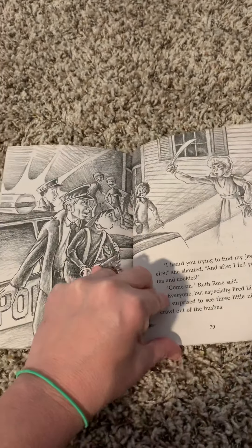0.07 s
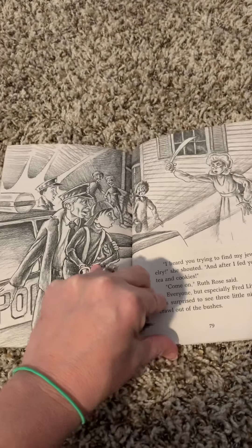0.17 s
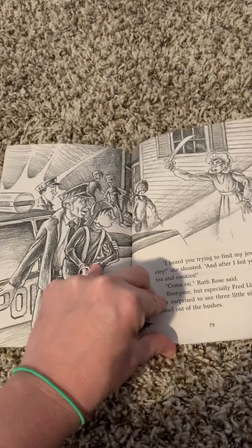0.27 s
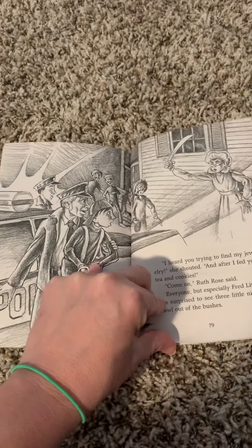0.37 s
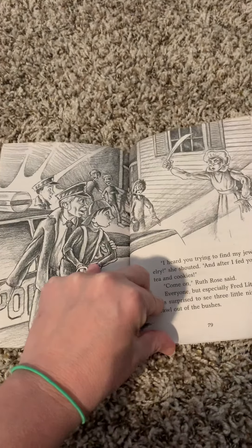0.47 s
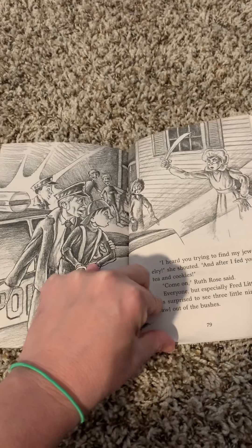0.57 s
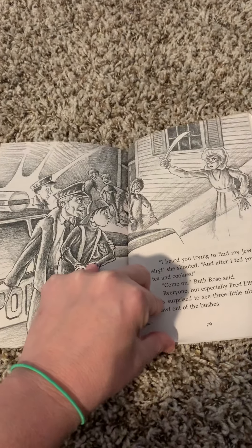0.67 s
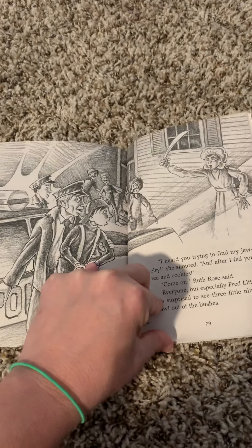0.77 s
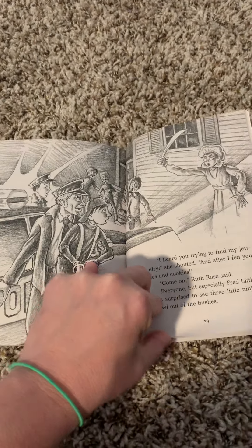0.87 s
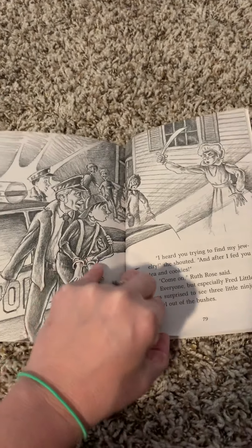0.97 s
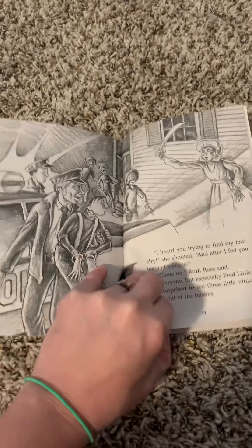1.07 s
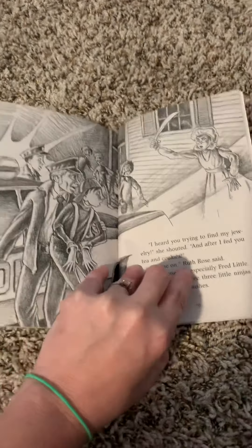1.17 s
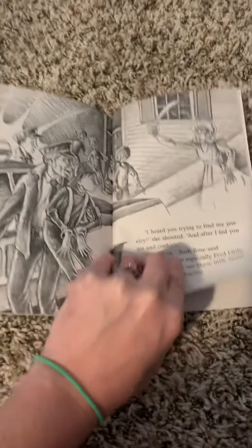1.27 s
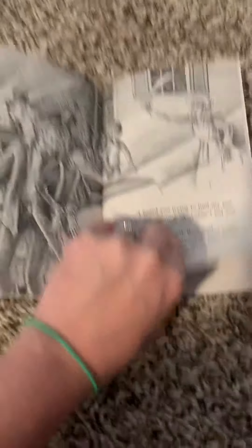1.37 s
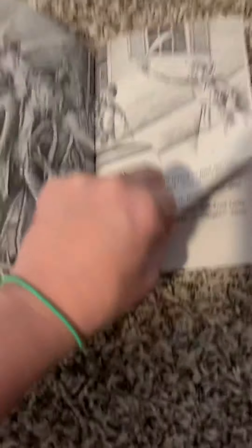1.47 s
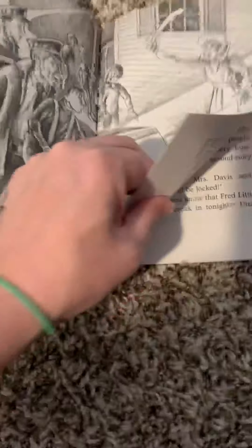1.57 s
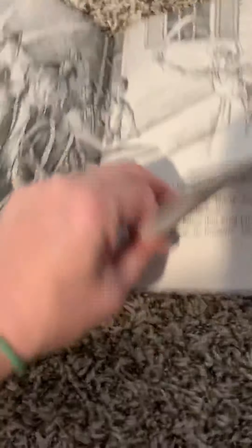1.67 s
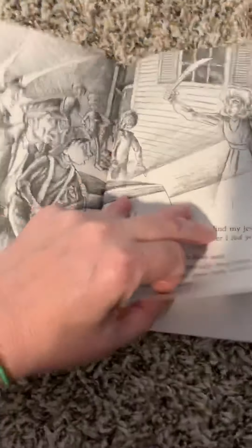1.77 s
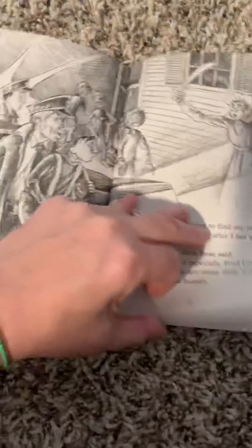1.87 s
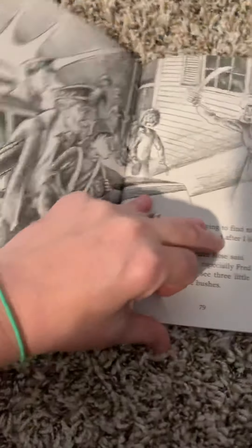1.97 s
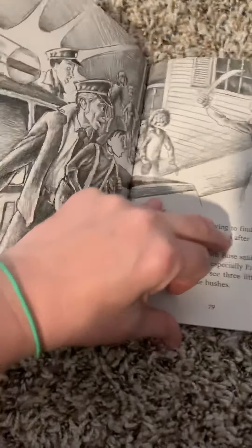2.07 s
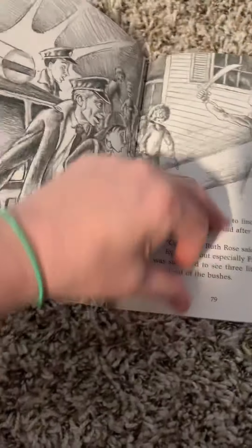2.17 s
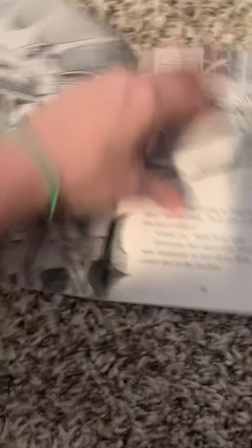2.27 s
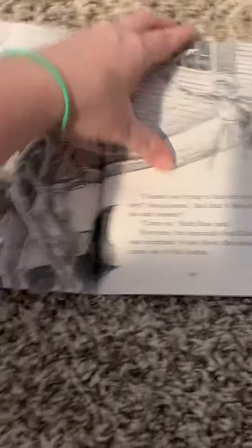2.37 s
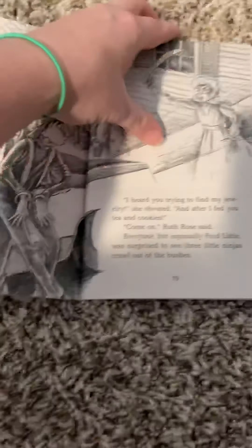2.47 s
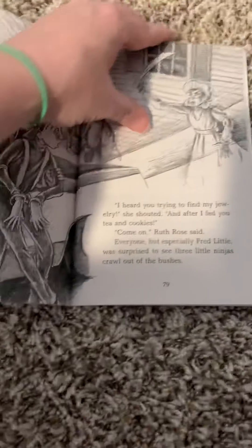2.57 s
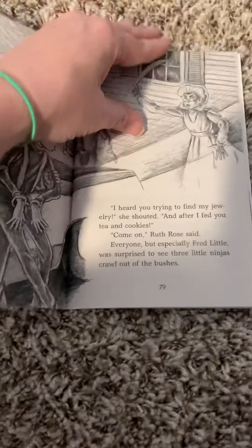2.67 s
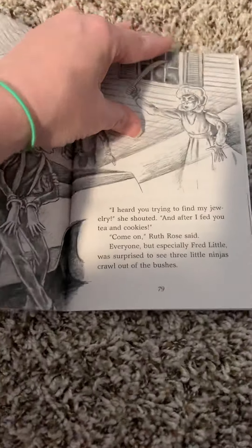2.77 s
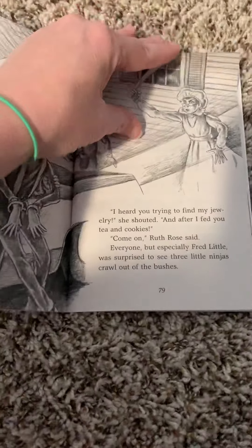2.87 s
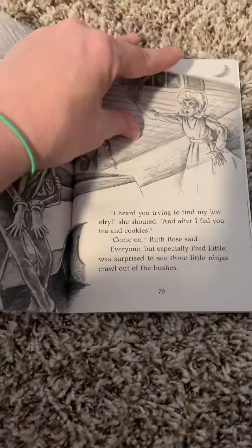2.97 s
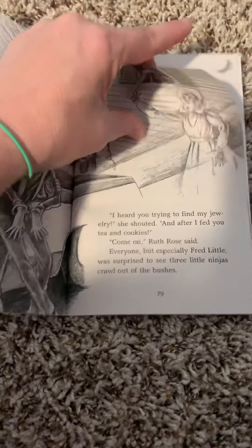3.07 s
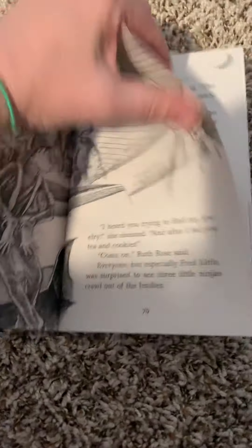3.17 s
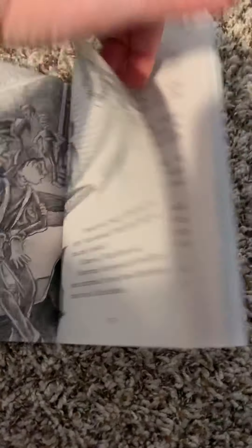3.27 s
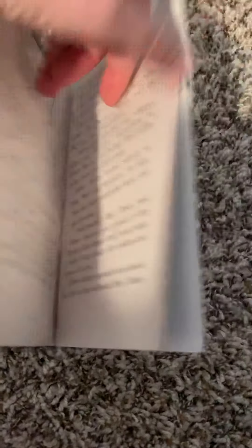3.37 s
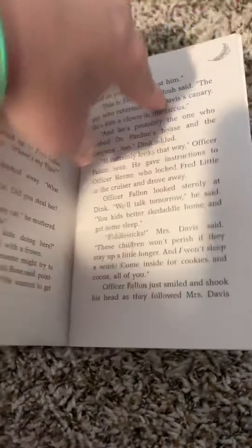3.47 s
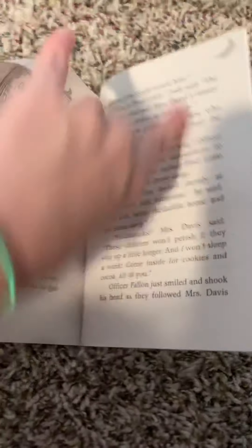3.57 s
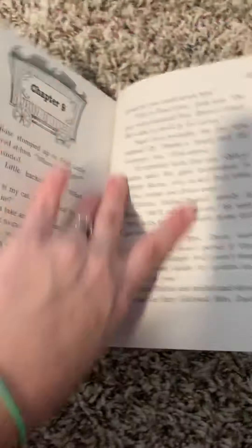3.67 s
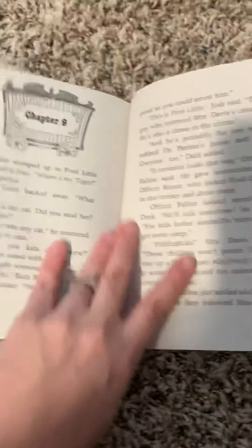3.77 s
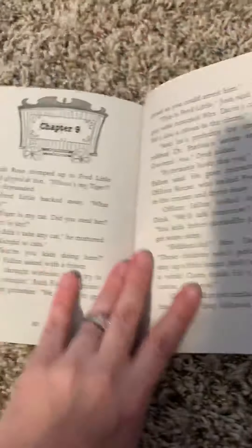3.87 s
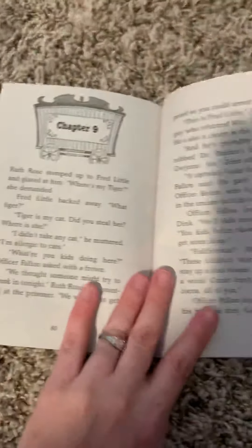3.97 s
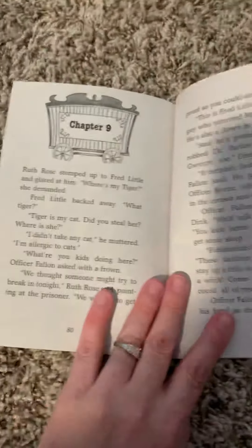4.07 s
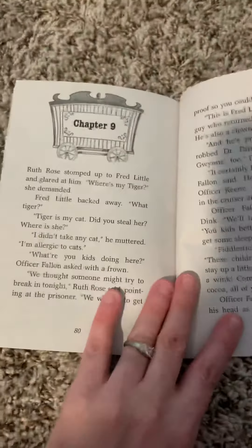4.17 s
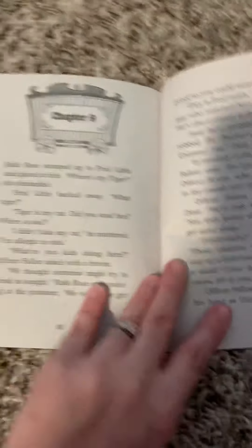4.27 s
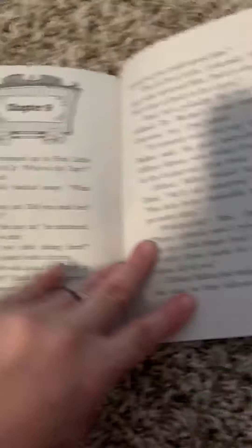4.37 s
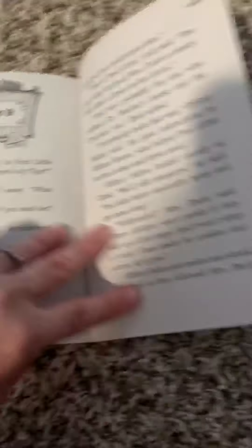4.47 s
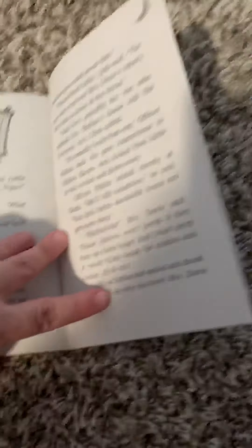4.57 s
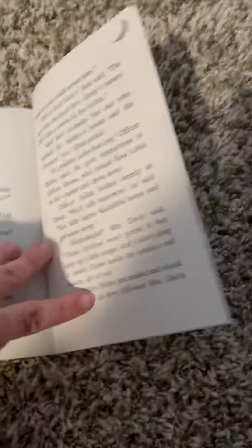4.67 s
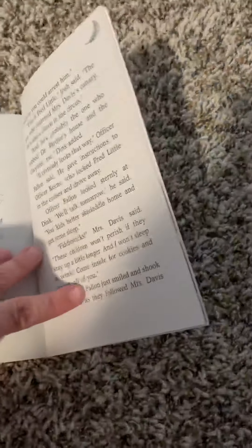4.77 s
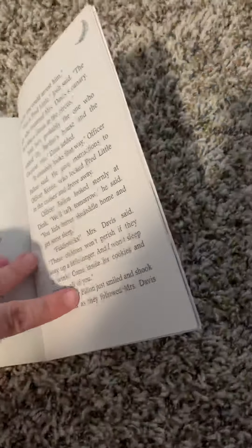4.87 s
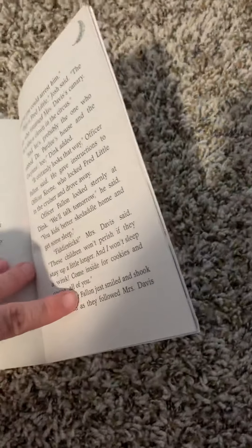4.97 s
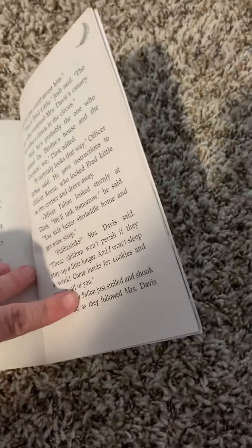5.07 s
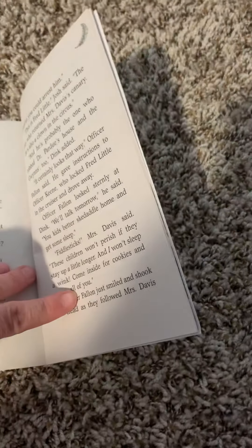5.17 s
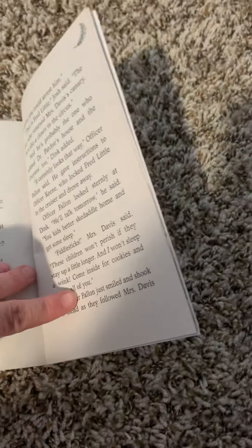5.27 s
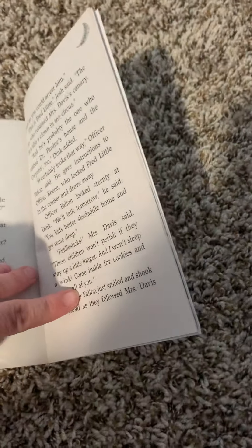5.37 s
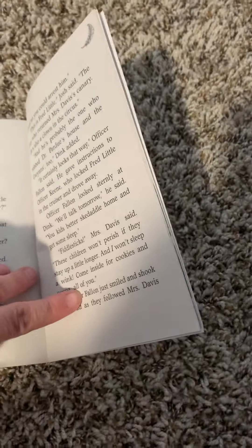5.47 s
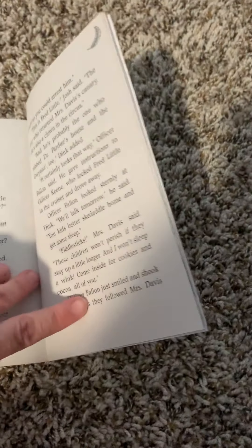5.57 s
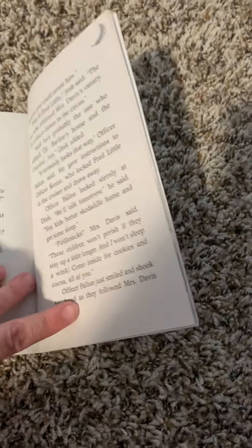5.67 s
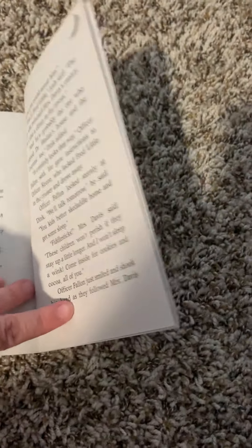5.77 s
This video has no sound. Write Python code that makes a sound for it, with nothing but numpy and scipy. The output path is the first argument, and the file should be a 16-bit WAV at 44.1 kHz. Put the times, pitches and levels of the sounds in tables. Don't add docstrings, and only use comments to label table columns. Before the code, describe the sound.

Very close, dry stereo sound of a book handled indoors: faint skin-on-paper scrapes and ticks, a swishing page with a hard, bright snap just after two seconds, a denser burst of crackling and flapping just past three, rustles settling, then near quiet with small rubs and a last brief crinkle. Low ventilation hum stays beneath.

```python
import sys
import numpy as np
from scipy import signal
from scipy.fft import rfft, irfft, next_fast_len
from scipy.io import wavfile
from scipy.ndimage import uniform_filter1d

SR = 44100
rng = np.random.default_rng(int(sys.argv[2]) if len(sys.argv) > 2 else 0)


def ratio(d):
    e = np.asarray(d, float) / 20
    return 10 ** e


def wav_record(signal):
    frames = np.transpose(np.atleast_2d(signal))
    bounded = np.clip(frames, -1, 1)
    quanta = np.round(bounded * 32767).astype(np.int16)
    wavfile.write(sys.argv[1], SR, quanta)


N = 256662
T = np.arange(N) / SR


def level(x, db):
    return x * ratio(db) / np.sqrt(np.mean(x ** 2))


def band(x, hz, width):
    return signal.lfilter(*signal.iirpeak(min(hz, .45 * SR), hz / width, SR), x)


def walk(rate):
    hold = int(SR / rate)
    steps = np.repeat(rng.standard_normal(N // hold + 1), hold)
    return 1.273 * uniform_filter1d(uniform_filter1d(steps, hold), hold)[:N]


def add(out, s, sound):
    i = max(int(s * SR), 0)
    out[i:i + len(sound)] += sound[:N - i]


def swell(rise, t60, size=6000):
    t = np.arange(size) / SR - 4 * rise
    build_up = np.exp(np.minimum(t, 0) / rise)
    decay = np.exp(-np.log(1000) * np.maximum(t, 0) / t60)
    return np.where(t < 0, build_up, decay)


def room():
    # f/Hz, level/dB per Hz
    room_tone = [(55, 5.5), (110, -7), (230, -12.5), (500, -28.5), (1000, -27), (1800, -19), (3500, -27.5),
                 (12000, -31)]
    out, breathe = 0, walk(4.7)
    hz_at, db_at = np.transpose(room_tone)
    for hz in 32 * 2 ** np.arange(0, 9.1, .5):
        mid, side = (band(band(rng.standard_normal(N), hz, hz / 1.6), hz, hz / 1.2) for _ in range(2))
        db = np.interp(np.log(hz), np.log(hz_at), db_at) + 1.0 * breathe + 1.1 * walk(36)
        apart = np.clip(hz / 500, 0, 1) * (hz < 2200)
        out = out + ratio(db) * (mid + apart * side * np.array([[1], [-1]]))
    return level(out, -73)


def gestures():
    # t/s, hiss level/dB, fade/s, sheen over hiss/dB, sheet over hiss/dB
    grips = [(0.0, -61, 0.11, -3.5, -11), (.36, -77.5, 0.11, 5, 4), (.695, -77.5, 0.051, 3, 2),
             (.934, -61, 0.75, -0.5, -4.5), (1.2, -65, 0.054, 1, 10), (1.275, -47.5, 0.044, 4.5, -8),
             (2.785, -62.5, 0.043, 3, 2.5), (.835, -80, 0.086, 1, 8), (1.41, -42, 0.15, 1, -9),
             (1.912, -43.5, 0.041, 1, -7), (2.814, -50, 0.079, 6, -1), (2.933, -39, 0.03, -0.5, -7),
             (2.98, -57, 0.72, -1.5, -11), (3.113, -34.5, 0.041, 0.5, -10), (3.165, -45.5, 0.23, 10, 1.5),
             (3.25, -41.5, 0.47, 2.5, -18.5), (3.79, -51, 0.26, 8.5, -7.5), (4.29, -61.5, 0.42, 7, -3),
             (4.425, -60.5, 0.058, 19, 1.5), (4.695, -60.5, 0.096, 2.5, -2.5),
             (5.244, -68, 0.11, -2.5, -8.5), (5.33, -73, 0.091, -7, 4.5), (5.44, -46, 0.086, -3.5, -11.5),
             (5.546, -44, 0.045, -3, -8), (5.672, -53, 0.04, 2, -7)]
    # t/s, hiss level/dB, swell/s, sheen over hiss/dB, sheet over hiss/dB
    strokes = [(.096, -55.5, 0.028, -3.5, -11.5), (.204, -58, 0.045, -6.5, -19),
               (.347, -59, 0.047, -2.5, -8), (.6, -83.5, 0.1, 2.5, -3), (.862, -74.5, 0.091, -3.5, 1.5),
               (1.05, -60.5, 0.12, 4.5, -2.5), (1.125, -48.5, 0.033, 1.5, -2.5),
               (1.34, -47.5, 0.14, -1, -13.5), (1.452, -46, 0.037, 0.5, -7.5), (1.635, -50.5, .04, -4, 1),
               (3.225, -34.5, .014, -0.5, -13), (1.71, -43.5, 0.19, -0.5, -4),
               (2.047, -60.5, 0.44, -7.5, -5), (2.15, -48, 0.023, 9.5, -3),
               (2.174, -38.5, 0.0098, 11.5, -26.5), (2.26, -44, 0.074, 7, -3.5),
               (2.311, -56.5, 0.13, 15.5, 5.5), (2.419, -58, 0.18, 12.5, -3), (2.634, -52, 0.13, 8.5, -4.5),
               (3.197, -53, 0.068, -6, 4), (3.364, -46, 0.015, 2.5, -0.5), (3.46, -44.5, 0.098, -9.5, -2),
               (3.652, -50.5, 0.049, -1.5, 3.5), (3.755, -45, 0.059, 3, 1), (5.112, -68, 0.031, -1, -5.5),
               (5.184, -57, 0.022, -6, -13), (5.376, -62.5, 0.038, -5, -8)]
    # t/s, hiss level/dB, build-up/s, sheen over hiss/dB, sheet over hiss/dB
    drags = [(.23, -71.5, .6, -13.5, 2.5), (.31, -71, 0.13, -14.5, -5), (1.63, -52, 0.23, -25, -2),
             (1.84, -45, 0.33, 3.5, -15.5), (2.135, -59, 0.077, -21, -13), (2.72, -71.5, 0.72, -6, 2.5),
             (3.09, -50.5, 0.06, 0, -6), (3.233, -31, 0.076, -21, -16.5), (3.476, -41, 0.24, -13.5, -10.5),
             (3.71, -48, 0.31, 4.5, -4.5), (3.56, -55.5, .3, -2, -7), (4.55, -58.5, .1, 7.5, -8),
             (4.07, -59.5, 0.57, -2, -10.5), (4.25, -72.5, 0.38, -13, -2.5), (4.514, -54.5, 0.24, 10, -8),
             (4.63, -68, .3, -6, -7.5), (4.765, -60.5, 0.19, 0, -14), (4.969, -60.5, 0.42, -4.5, -14),
             (5.03, -67.5, .1, -5.5, -9.5), (5.49, -59, .08, 2.5, 1.5), (5.577, -46, 0.057, -1, -11),
             (3.137, -50.5, .05, -5.5, -5), (5.819, -51.5, 0.24, -1, -6)]
    grip_s, let_go_s = 0.021, 0.033
    haste = np.array([[1], [1], [1.035]])
    coarse = T[::64]
    power = 1e-18
    for table, rise, fall in ((grips, grip_s, None), (strokes, None, None), (drags, None, let_go_s)):
        for s, db, length, sheen_db, sheet_db in table:
            length = max(length, .005)
            away = np.where(coarse < s, (s - coarse) / (rise or length), (coarse - s) / (fall or length))
            peak_db = db + np.array([[0], [sheen_db], [sheet_db]])
            power = power + ratio(2 * (peak_db - 20 * away ** 1.5 * haste))
    return [np.interp(T, coarse, np.sqrt(p)) for p in power]


def patches(peaks, slips, focus_hz, grain, sharp, patchy_db, rate):
    out, power = 0, 0
    for hz, db in peaks:
        friction = rng.standard_normal(N) * (1 + grain * slips)
        ring = band(band(friction, hz, hz / sharp), hz, 1.9 * hz / sharp)
        gain = ratio(db + 5.1 * np.exp(-(np.log(hz / focus_hz) / 0.5) ** 2))
        out = out + level(ring, 0) * gain * ratio(patchy_db * walk(rate))
        power = power + gain ** 2
    return level(out / np.sqrt(power), 0)


def rub():
    # f/Hz, level/dB
    hiss_peaks = [(3100, -5), (3700, -6.5), (4400, 0), (5200, 0.5), (6200, -4.5)]
    sheen_peaks = [(7400, -3), (8700, -0.5), (10200, 1), (12000, -3), (14200, -1.5)]
    sheet_peaks = [(780, -0.79), (1000, -0.38), (1280, -0.49), (1600, 0.95), (2000, 0.22), (2500, 0.77)]
    block_peaks = [(75, -4), (115, -6), (170, -2), (260, -2.5), (380, 0), (560, 6)]
    # t/s, sheet ring f/Hz, book block over sheet/dB
    hold = [(0.1, 800, 4.5), (0.3, 1734, 5), (0.9, 840, 1), (1.15, 810, -6), (1.28, 1070, -13),
            (1.45, 920, -6), (1.72, 2430, -18), (1.9, 860, -4.5), (2.35, 1450, -6), (2.82, 840, -3.5),
            (2.93, 1500, -5.5), (3.2, 1610, -13), (3.7, 1400, -3.5), (4.349, 1300, -4), (4.75, 2600, -14.5),
            (5.2, 2500, -29.5), (5.46, 930, -16.5), (5.8, 1230, -9)]
    slips = (rng.random(N) < 1500 / SR) * ratio(3.2 * np.minimum(rng.exponential(size=N), 4.6))
    grip = ratio(1.0 * walk(45) + 1.44 * walk(160))
    hiss, sheen, sheet = gestures()
    s, ring_hz, block_db = np.transpose(hold)
    sheet_hz = np.interp(T, s, ring_hz)
    block = sheet * ratio(np.interp(T, s, block_db))
    bright_hz = 6500 * 2 ** (20 * np.log10(sheen / hiss) / 12)
    out = hiss * patches(hiss_peaks, slips, bright_hz, grain=0.53, sharp=4.1, patchy_db=3.5, rate=38)
    out += sheen * patches(sheen_peaks, slips, bright_hz, grain=1.0, sharp=2.8, patchy_db=3.5, rate=41)
    out += sheet * patches(sheet_peaks, slips, sheet_hz, grain=1.1, sharp=3.8, patchy_db=5.0, rate=30)
    out += block * patches(block_peaks, slips, sheet_hz, grain=1.6, sharp=1.26, patchy_db=5.0, rate=15)
    return grip * out


def sings(sharp=13.0, size=16000):
    # t/s, swell/s, level/dB, f/Hz, glide/octaves per s
    first_page = [(.09, 0.015, -58, 6210, -0.6), (.26, 0.058, -70, 1810, -2.5), (.29, .07, -68, 3480, -0.5),
                  (.855, 0.024, -77, 4000, -0.5), (.867, 0.01, -82, 6100, -2),
                  (1.0, 0.061, -67.5, 799, 0.2), (1.04, 0.063, -61.5, 7360, 1), (1.07, .04, -68, 5600, -4),
                  (1.275, 0.022, -57, 1200, 2.5), (1.283, 0.014, -41.5, 6580, 1.3),
                  (1.288, 0.014, -44, 3490, -2), (1.34, 0.056, -54, 5250, -2),
                  (1.56, 0.18, -56, 3730, -1.5), (1.7, 0.025, -51, 1800, 0), (1.715, 0.031, -47, 5150, 0.5),
                  (1.8, .02, -48, 4670, -2.5), (1.83, 0.057, -47.5, 6920, 0),
                  (1.91, 0.018, -41, 5280, -3.5), (2.25, 0.027, -47.5, 1403, 2),
                  (2.26, 0.016, -51.5, 4000, -0.5), (2.264, 0.025, -45.5, 8510, 2.5),
                  (2.266, .02, -44.5, 5520, 2), (2.37, 0.036, -46.5, 7070, 0.1),
                  (2.385, 0.039, -44, 10300, 0.5), (2.53, 0.096, -54.5, 10570, -1),
                  (2.66, 0.011, -54, 7520, 1.5), (2.667, 0.0091, -59.5, 9900, 1),
                  (2.875, 0.0062, -52.5, 7400, 0)]
    # t/s, swell/s, level/dB, f/Hz, glide/octaves per s
    second_page = [(3.166, 0.0069, -30, 9000, -0.5), (3.186, .008, -27.5, 8800, -2),
                   (3.222, 0.009, -42, 4800, 2.5), (3.29, 0.043, -40.5, 9000, -1),
                   (4.86, 0.057, -76.5, 2200, -0.2), (5.18, 0.016, -75.5, 2500, 0),
                   (5.7, 0.056, -74, 3000, .3), (3.115, 0.0091, -46.5, 1308, 1.7),
                   (3.132, .006, -39.5, 3300, -0.6), (3.232, 0.0033, -26.5, 3755, 1.3),
                   (3.335, 0.022, -36.5, 4200, 1), (3.41, 0.035, -44, 6300, 0),
                   (3.455, 0.024, -39, 4360, 0.5), (3.455, 0.016, -49.5, 1200, 3.5),
                   (3.65, 0.012, -52.5, 1100, 1.8), (3.76, 0.016, -43, 2826, 4.5),
                   (4.23, 0.029, -72, 6000, -0.5), (4.3, 0.016, -61, 6330, 4), (4.76, 0.019, -68, 6920, 3),
                   (5.55, 0.0087, -53, 1150, -9.5), (5.555, 0.0095, -51, 3184, -2.5),
                   (5.79, 0.0064, -57, 1085, -4.5)]
    table = first_page + second_page
    t = (np.arange(size) - size / 2) / SR
    out, chance = np.zeros(N), rng.standard_normal((len(table), 2, size))
    for (s, length, db, hz, glide), (a, b) in zip(table, chance):
        smooth = int(SR * sharp / hz / 2)
        waver = uniform_filter1d(a, smooth) + 1j * uniform_filter1d(b, smooth)
        turn = np.exp(2j * np.pi * np.cumsum(hz * 2 ** (glide * t)) / SR)
        shape = ratio(-20 * np.abs(t / (2 * max(length, .003))) ** 1.5)
        skip = max(int(size / 2 - s * SR), 0)
        add(out, s - size / 2 / SR, (level(np.real(waver * turn), db) * shape)[skip:])
    return out


def blows(table, rise, sharp, rough):
    out, chance = np.zeros(N), rng.standard_normal((len(table), 6000))
    for (s, db, hz, t60), noise in zip(table, chance):
        shape = swell(rise, max(t60, .005))
        tone = np.sin(2 * np.pi * hz * np.arange(len(shape)) / SR)
        flutter = level(band(band(noise, hz, hz / sharp), hz, 2 * hz / sharp), 0)
        sound = shape * (tone + rough * flutter)
        add(out, s - 2 * rise, ratio(db) * sound / np.abs(sound).max())
    return out


def flaps():
    # t/s, peak level/dB, f/Hz, decay/s
    cover = [
        (3.192, -31, 232, 0.091),
        (0.089, -52.5, 800, 0.054),
        (.162, -51, 847, .02),
        (0.2, -50, 740, 0.018),
        (.226, -52, 780, .025),
        (2.274, -45.5, 2000, .015),
        (4.3, -48.5, 1900, 0.013),
        (0.28, -66, 580, 0.047),
        (1.3, -45, 1000, 0.03),
    ]
    # t/s, peak level/dB, f/Hz, decay/s
    page = [(1.113, -38.5, 770, 0.03), (1.258, -45, 1070, 0.038), (2.922, -41.5, 1100, 0.031),
            (5.428, -54.5, 990, 0.018), (1.124, -32, 832, 0.065), (1.415, -40.5, 586, 0.029),
            (1.449, -36, 1880, 0.0083), (1.451, -34.5, 292, 0.048), (1.885, -32, 875, 0.022),
            (1.891, -32, 418, 0.0082), (2.173, -39, 269, 0.052), (2.311, -34.5, 1420, 0.015),
            (2.63, -42, 1000, 0.028), (2.801, -39.5, 760, 0.0086), (3.189, -23.5, 1730, 0.022),
            (3.2042, -17, 1570, 0.0087), (3.455, -37, 1353, 0.022), (3.485, -54, 1340, 0.02),
            (3.644, -38, 956, 0.035), (3.674, -35, 1430, 0.033), (3.732, -35, 1420, 0.023),
            (3.755, -37, 1530, 0.039), (3.873, -44.5, 1357, 0.023), (4.419, -45, 980, 0.015),
            (5.607, -51, 211, 0.019), (3.182, -31, 843, 0.016), (5.542, -39.5, 1510, 0.025),
            (5.722, -45, 1040, 0.012), (5.759, -50, 1780, 0.02), (2.173, -31.5, 998, 0.018),
            (4.428, -51.5, 319, .03), (5.726, -56, 397, 0.019), (5.612, -54, 484, 0.015),
            (3.161, -29, 1160, 0.031), (1.687, -39, 3070, 0.078), (1.58, -54, 270, 0.063),
            (2.32, -41.5, 264, 0.055), (3.54, -57, 278, 0.036), (4.776, -61, 1540, .015)]
    return blows(page + cover, rise=0.0007, sharp=1.67, rough=0.54)


def snaps():
    # t/s, peak level/dB, f/Hz, sheet ring over
    # peak/dB
    ticks = [(0.1337, -45, 6500, -18), (0.163, -43, 5000, -17), (0.2007, -35.5, 6500, -25),
             (0.927, -47, 6000, -22), (2.025, -50, 4840, -5), (2.1024, -37, 8900, -12),
             (2.8136, -34, 11300, -23), (3.1529, -24, 9200, -8), (3.2002, -18.5, 7800, -3.5),
             (3.6227, -24, 3770, -11), (3.876, -31, 6500, -6.5), (3.6547, -33.5, 5300, 0),
             (4.337, -40, 10700, -16), (4.8356, -41, 6000, -16), (4.969, -43.5, 8530, -11),
             (5.1821, -51, 5330, -25), (5.2357, -41, 5630, -8), (5.6052, -32, 9000, -13),
             (0.197, -44, 6090, -20), (.2127, -41, 6300, -24), (.222, -45, 7200, -26),
                (.3379, -30.5, 9700, -18), (0.353, -36.5, 6900, -30), (0.384, -45.5, 15000, -28),
                (.2966, -57, 3400, -18), (.307, -51, 3700, -17), (1.286, -26.5, 6600, -27),
                (2.1411, -24.5, 4430, -29), (2.1486, -25, 4020, -17), (2.149, -24.5, 4520, -22.5),
                (2.1535, -17.5, 9600, -27), (2.1562, -17, 12200, -25.5), (2.1573, -22.5, 4400, -24.5),
                (2.164, -26.5, 9500, -28), (2.172, -16, 11600, -35.5), (2.5761, -28.5, 9000, -12.5),
                (2.6044, -21, 10700, -19.5), (2.612, -28, 10500, -17), (2.6172, -23.5, 11500, -20),
                (2.6236, -19, 10900, -22), (2.8036, -34.5, 8100, -7), (3.3632, -20, 4120, -19.5),
                (4.6163, -48, 8400, -20), (4.782, -54, 7000, -16), (5.3206, -51.5, 4300, -19.5),
                (5.447, -37, 6700, -18), (5.576, -40, 7300, -14), (5.784, -41, 6800, -8),
                (3.1585, -23, 7500, -9.5), (3.1835, -19.5, 8200, -9), (3.186, -16.5, 7800, -10),
                (3.2225, -23.5, 6500, -12), (3.2255, -18, 7300, -13), (3.2269, -18.5, 5800, -11),
                (3.284, -24, 10200, -24), (1.58, -39, 3690, -10.5), (1.685, -35, 3200, -10.5),
                (5.43, -42, 6500, -8), (4.462, -47.5, 4000, -5)]
    # t/s, peak level/dB, f/Hz, sheet ring over peak/dB, decay/s
    folds = [(0.3458, -26, 15000, -36, 0.0097), (1.1289, -33, 4920, -13, 0.016),
             (1.4506, -36.5, 2200, -5, 0.0039), (1.8871, -29, 2610, -1.5, 0.0088),
             (2.1521, -17, 4320, -17, 0.0073), (2.163, -18, 9800, -35, 0.0031),
             (2.1678, -18.5, 6000, -20, 0.0051), (2.1713, -4, 6700, -23.5, 0.0044),
             (2.1740, -12, 7330, -28.5, 0.011), (2.6032, -21.5, 10900, -16, 0.0067),
             (2.6347, -22, 11400, -8, 0.008), (2.9323, -27, 3965, -19, 0.014),
             (2.94, -21.5, 10100, -26, 0.012), (3.1094, -33.5, 5260, -5, 0.014),
             (3.1638, -15.5, 8000, -9, 0.0088), (3.1664, -14.5, 8510, -16, 0.0024),
             (3.1878, -21, 7200, 1, 0.013), (3.189, -13, 9500, -12.5, 0.01),
             (3.2311, -9.5, 3630, -25, 0.009), (3.3351, -18.5, 10900, -15, 0.015),
             (3.487, -18.5, 4530, -24.5, 0.0065), (4.6134, -40.5, 7500, -37, 0.023),
             (4.7605, -40, 7850, -29, 0.0077), (5.6073, -34, 8380, -6.5, 0.012)]
    table = folds + [(*tick, .0062) for tick in ticks]
    out, chance = np.zeros(N), rng.standard_normal((len(table), 6000))
    for (s, db, hz, ring_db, t60), noise in zip(table, chance):
        t60 = np.clip(t60, .001, .016)
        rise = max(.00015, .3 * (t60 - .008))
        burst = noise * swell(rise, t60)
        burst[int(4 * rise * SR)] += 2.6
        edge = .14 * min(hz / 9000, 1) ** 2 * np.diff(burst, 2, prepend=[0, 0])
        bright = band(band(burst, hz, .35 * hz), hz, .9 * hz) + edge
        ring = band(noise * swell(rise, 2.0 * t60), 1400, 1800)
        sound = bright / np.abs(bright).max() + ratio(ring_db) * ring / np.abs(ring).max()
        add(out, s - 4 * rise, ratio(db) * sound)
    return out


def thuds():
    # t/s, peak level/dB, f/Hz, decay/s
    presses = [
        (1.459, -55.5, 127, 0.069),
        (2.311, -37, 72.5, 0.064),
        (3.167, -43, 58.8, 0.066),
        (3.209, -34, 80, 0.04),
        (3.24, -46.5, 78.4, 0.098),
        (3.409, -52, 59.7, 0.073),
        (3.9, -60.5, 160, 0.12),
        (3.737, -45, 85.7, 0.044),
    ]
    return blows(presses, rise=0.011, sharp=5.3, rough=0.92)


def reflections(x, t60=0.088, wet_db=-16):
    t = np.arange(8000) / SR
    tail = rng.standard_normal((2, 8000)) * np.exp(-np.log(1000) * t / t60) * (t > .002)
    dull = signal.lfilter([1], [1, -.6], tail)
    tail = signal.lfilter([1, -1], [1, -.96], dull)
    tail = ratio(wet_db) * tail / np.sqrt(np.sum(tail[0] ** 2))
    return signal.fftconvolve(x[None], tail, axes=1)[:, :N]


def scene():
    book = rub() + sings() + flaps() + snaps() + thuds()
    return book + reflections(book) + room()


def roll_off(x):
    return signal.sosfilt(signal.butter(12, 16810, fs=SR, output="sos"), x)


def record(dry):
    # f/Hz, lag/radians
    port_lag = [(30, -.12), (550, -.45), (1000, -.3), (1550, -.05), (2100, .9), (2600, 1.6), (3750, 1.8),
                (4740, np.pi)]
    size = next_fast_len(N + 4096)
    hz = np.arange(size // 2 + 1) * SR / size
    hz_at, lag_at = np.transpose(port_lag)
    lag = np.interp(np.log(hz + 1), np.log(hz_at), lag_at)
    lag = lag + 2 * np.pi * np.maximum(hz - hz_at[-1], 0) / 4178
    tilt_db = 1.7 * np.exp(-np.log((hz + 1) / 650) ** 2 / .3) + .35 * (hz < 400)
    ports = np.array([ratio(-tilt_db) * np.exp(.5j * lag), ratio(tilt_db) * np.exp(-.5j * lag)])
    top_hz, rumble_cut_hz = 15850, 41
    top_cut = ratio(-40 * np.clip((hz - top_hz) / 150, 0, 1))
    heard = rfft(dry, size) * ports * top_cut / np.sqrt(1 + (rumble_cut_hz / (hz + 1)) ** 6)
    sound = irfft(heard, size)[:, :N]
    quarter_turn = irfft(heard * 1j * (hz > hz_at[4]), size)[:, :N]
    sound = sound + .14 * walk(150) * np.array([[1], [-1]]) * quarter_turn
    return roll_off(sound)


dry = scene()
out = record(dry)
wav_record(out)
```